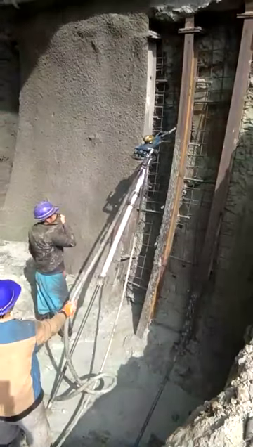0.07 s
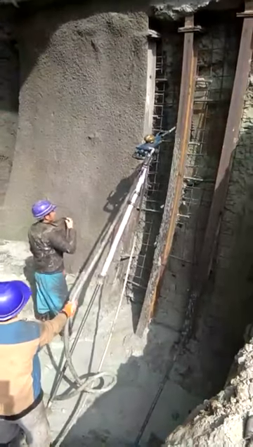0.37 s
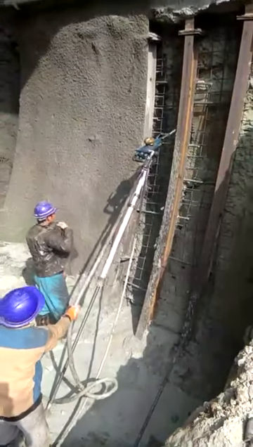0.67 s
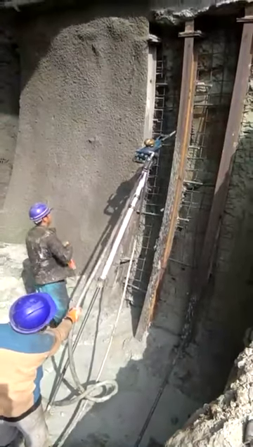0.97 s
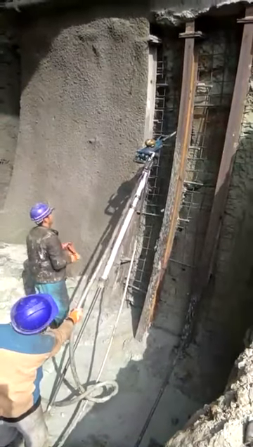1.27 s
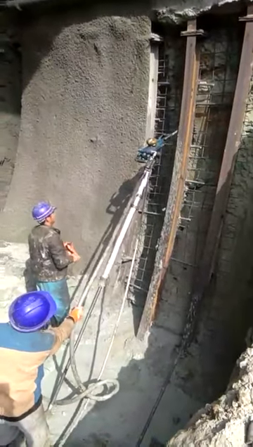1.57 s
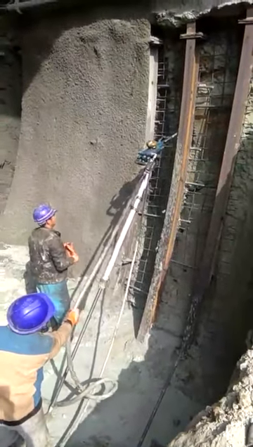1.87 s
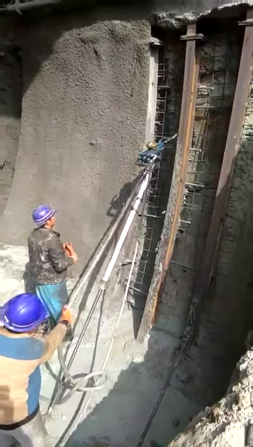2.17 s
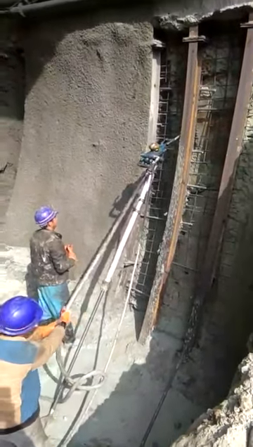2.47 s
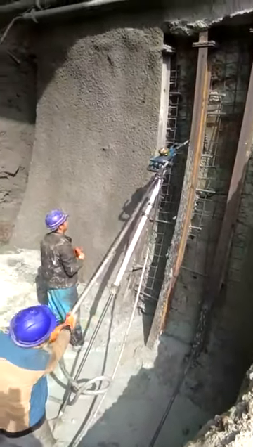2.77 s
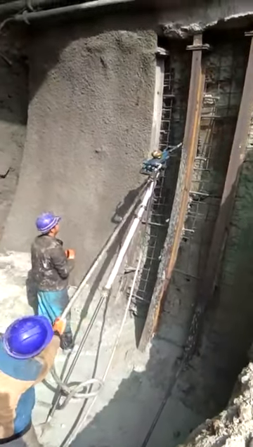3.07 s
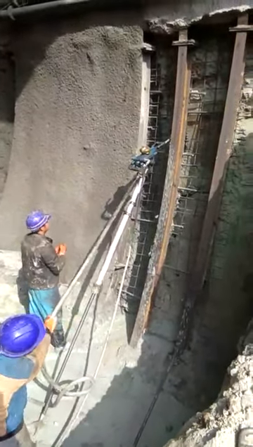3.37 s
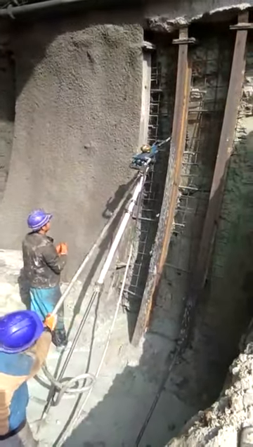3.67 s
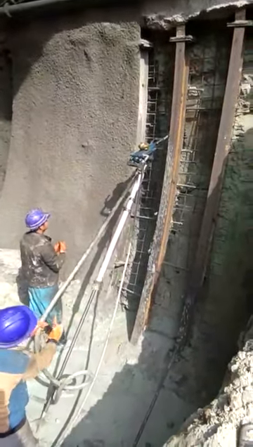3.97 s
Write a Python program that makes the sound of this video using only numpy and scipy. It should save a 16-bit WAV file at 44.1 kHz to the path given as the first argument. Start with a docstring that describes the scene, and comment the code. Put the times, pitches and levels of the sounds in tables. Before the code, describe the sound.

Loud, steady pneumatic drill boring into rock, droning and rattling over a hiss of air.

```python
"""A pneumatic rock drill bores into the wall of a concrete-lined pit, about 42 blows a second.
The exhaust drones and barks on every stroke, the piston makes the drill steel clatter and ring,
chips tick and spent air hisses in pulses. Now and then the bit meets hard stone and clangs.
Two deep dips in the treble fill in after about two and a half seconds; a low rumble lies beneath."""
import sys
import numpy as np
from scipy import signal
from scipy.fft import rfft, irfft
from scipy.io import wavfile
from scipy.ndimage import uniform_filter1d

SR = 44100
rng = np.random.default_rng(int(sys.argv[2]) if len(sys.argv) > 2 else 0)


def generate_wav(sig):
    """Save sig (samples, or channels by samples) to the path in sys.argv[1] as 16-bit PCM at SR."""
    pcm = np.round(np.clip(np.atleast_2d(sig).T, -1, 1) * 32767).astype(np.int16)
    wavfile.write(sys.argv[1], SR, pcm)


N = 176400
TIME = np.arange(N) / SR
BINS_HZ = np.arange(N // 2 + 1) * SR / N

# How far the piston runs ahead of its steady beat as the load changes: time_s, lead_cycles
PISTON_LEAD = [(0, .17), (.3, .18), (.56, .1), (.68, -.04), (.86, .01), (.97, -.11), (1.1, -.11),
               (1.2, -.23), (1.62, -.31), (2.15, -.235), (2.4, -.335), (2.52, -.255), (3.0, -.21),
               (3.38, -.18), (3.55, -.065), (3.95, -.11)]
# Harmonics of the exhaust drone: blow_rate_multiple, level_db
DRONE_HARMONICS = [(2, -41.5), (3, -46), (4, -30), (5, -31.5), (6, -30.5), (7, -43.5), (9, -48.5),
                   (10, -45), (12, -48.5), (14, -48), (15, -50.5), (16, -41), (17, -38.5), (20, -40)]
# Puffs of the two strokes and their slaps off the walls: place_cycles, relative_level_db
PUFF_PATTERN = [(0.005, -3), (0.292, -0.5), (0.521, -8.5), (0.78, -4.5)]
# Tone of an exhaust puff: frequency_hz, gain_db
PUFF_EQ = [(20, -40.5), (70, -27), (150, -20), (310, 7), (355, -9), (395, -1), (470, -15.5), (580, -4.5),
           (660, 1.5), (810, 2.5), (980, -5), (1100, -4), (1700, -16.5), (3000, -22.5), (9000, -48.5)]
# Tone of steel clattering on rock: frequency_hz, gain_db
CLATTER_EQ = [(300, -29.5), (800, 5), (1280, -1.5), (1440, -1), (1670, 1.5), (1830, -9.5), (2000, -4),
              (2190, 2), (2400, -4), (2700, 1.5), (3500, -1.5), (5000, -10), (9000, -17)]
# How hard the bit bites, a fader on clatter and chips: time_s, gain_db
BITE_FADER = [(0, -2), (.35, -1.5), (.5, 1), (.74, -1), (1.1, -0.6), (1.3, 0), (1.45, 0), (1.6, -0.4),
              (1.9, -0.2), (2.4, 0), (2.8, -3), (3.3, -0.6), (3.95, 1.7)]
# The bit meets hard stone and the rod clangs: start_s, accent_db
STONE_HITS = [(.752, 12.5), (0.82, 4.5), (.845, 5), (1.258, 12.5), (1.309, 9.5), (1.335, 9.5), (1.573, 13),
              (1.619, 11.5), (1.91, 9.5)]
# Ringing modes of the drill steel: pitch_hz, early_level_db, late_level_db, t60_s
STEEL_MODES = [(1072, -44, -51, 0.1), (1577, -44.5, -54, 0.069), (1657, -46, -41.5, 0.05),
               (1888, -40, -54, 0.18), (2083, -47.5, -44, 0.1), (2212, -43, -42, 0.035),
               (2432, -40, -53, 0.15), (4084, -37.5, -43, 0.095), (4330, -43.5, -44, .05),
               (5130, -45, -39, 0.05), (4900, -44, -50, 0.054), (5500, -43.5, -47, 0.054)]
# Tone of the spent air, also used on the chips: frequency_hz, gain_db
HISS_EQ = [(300, -23), (900, -5.5), (2400, 1), (3100, -13.5), (3700, -7), (4500, 2), (5500, 0.5),
           (7000, 0.5), (8200, 1), (8800, 1.5), (9600, -3.5)]
# Humps and dips that tint the drill at first: centre_hz, width_hz, gain_db
TINT_BANDS = [(500, 12, 6), (540, 52, 4.5), (1580, 184, 2.5), (3135, 262, -8), (8190, 440, -16.5)]
# Wet/dry mix of that tint: time_s, wet_fraction
TINT_MIX = [(0, 0.89), (.7, 0.97), (2.3, 0.88), (2.55, 0.65), (2.72, 0.03), (3.95, 0.09)]
# Tone of the site rumble: frequency_hz, gain_db
RUMBLE_EQ = [(5, -36), (20, -21), (40, -18.5), (62, -12), (80, 1.5), (100, -6), (170, -4.5), (260, 1),
             (320, -1.5), (450, -8), (900, -26)]

BLOWS_PER_S = 41.6
STRIKE_PLACE, RETURN_PLACE, HISS_PLACE = .2, .66, .32  # within the piston cycle, 0-1


def piston_cycles(jitter_cycles=.011, drag_cycles=.016, rod_turns_per_s=4.1, easiest_s=.14):
    """Running count of piston cycles; the turning rod drags the beat to and fro."""
    cycles = BLOWS_PER_S * TIME + automation(PISTON_LEAD) + jitter_cycles * drift(rate_hz=12)
    return cycles + drag_cycles * np.cos(2 * np.pi * rod_turns_per_s * (TIME - easiest_s))


def exhaust_drone(cycles, roughness=.33):
    """Low harmonics of the exhaust crest together on each stroke; each wavers in level and phase."""
    drone = 0
    for multiple, level_db in DRONE_HARMONICS:
        waver = 1 + roughness * (drift(rate_hz=12) + 1j * drift(rate_hz=12))
        harmonic = np.real(waver * np.exp(2j * np.pi * multiple * cycles))
        drone += from_db(level_db) * unit_rms(harmonic)
    return drone


def exhaust_puffs(cycles, bark_db=-30, housing_db=-37):
    """Air barks sharply from the exhaust port, and the housing rings with every puff."""
    clicks = sum(from_db(db) * cycle_clicks(cycles, place, spread_db=-.6, jitter_s=.0004)
                 for place, db in PUFF_PATTERN)
    clicks -= clicks.mean()
    housing = ring(clicks, pitch_hz=657, t60_s=.13)
    barks = equalise(pit_reverb(clicks, wet_db=-1), PUFF_EQ)
    return from_db(bark_db) * barks + from_db(housing_db) * housing


def bit_clatter(cycles, level_db=-28, decay_s=.0086):
    """Each blow sets off a short burst of rattling steel and crushed rock."""
    strikes = cycle_clicks(cycles, STRIKE_PLACE, spread_db=5, jitter_s=.0014)
    return_knocks = cycle_clicks(cycles, RETURN_PLACE, spread_db=5, jitter_s=.0014)
    blows = strikes + from_db(-5) * return_knocks + from_db(-18) * stone_clicks()
    envelope = signal.lfilter([1], [1, -np.exp(-1 / (decay_s * SR))], blows)
    bursts = pit_reverb(envelope * rng.standard_normal(N), wet_db=6.5)
    return from_db(level_db + automation(BITE_FADER)) * equalise(bursts, CLATTER_EQ)


def steel_ring(cycles, rebound_db=1.5, clang_hz=1750, clang_width_hz=290):
    """The rod rings, struck a little differently each time; its modes rebalance as the tint fades."""
    ringing, early_share = 0, automation(TINT_MIX)
    # The rod bounces, so strong and weak blows alternate.
    rebound = from_db(rebound_db * np.cos(np.pi * (cycles - STRIKE_PLACE)))
    for pitch_hz, early_db, late_db, t60_s in STEEL_MODES:
        blows = rebound * cycle_clicks(cycles, STRIKE_PLACE, spread_db=2.2, jitter_s=.0004)
        clangs = bell_curve(pitch_hz, clang_hz, clang_width_hz) * stone_clicks()
        level_db = late_db + early_share * (early_db - late_db)
        ringing += from_db(level_db) * ring(blows + clangs, pitch_hz, t60_s)
    return ringing


def stone_clicks():
    """One click for each blow on hard stone."""
    start_s, accent_db = np.transpose(STONE_HITS)
    return np.bincount((start_s * SR).astype(int), from_db(accent_db), N)


def rock_chips(level_db=-34, ticks_per_s=420, spread_db=3.5, low_hz=1317, high_hz=6966, pitches=36):
    """Chips of rock and loose fittings tick at scattered pitches, louder when the bit bites."""
    onsets = rng.random(N) < ticks_per_s / SR
    clicks = onsets * from_db(spread_db * np.minimum(rng.standard_normal(N), 1))
    pitch_index = rng.integers(0, pitches, N)
    ticks = sum(ring(clicks * (pitch_index == k), pitch_hz, t60_s=.03)
                for k, pitch_hz in enumerate(np.geomspace(low_hz, high_hz, pitches)))
    return from_db(level_db + automation(BITE_FADER)) * equalise(ticks, HISS_EQ)


def air_hiss(cycles, level_db=-23.5, pulse_db=.4, flutter_db=1.5):
    """Spent air swells once a cycle and flutters."""
    flutter = drift(rate_hz=70)
    flutter -= uniform_filter1d(flutter, size=2200)  # keep only the fast movement
    swell_db = pulse_db * np.cos(2 * np.pi * (cycles - HISS_PLACE)) + flutter_db * flutter
    return from_db(level_db + swell_db) * equalise(rng.standard_normal(N), HISS_EQ)


def pit_reverb(sound, wet_db, t60_s=.15, crossfade_s=.45):
    """Adds dense wall reflections whose resonances shift as the listening point sways."""
    tail_s, wet = TIME[:SR // 2], 0
    for centre_s in np.arange(0, TIME[-1] + crossfade_s, crossfade_s):
        tail = rng.standard_normal(len(tail_s)) * from_db(-60 * tail_s / t60_s)
        share = np.clip(1 - np.abs(TIME - centre_s) / crossfade_s, 0, 1)
        wet += np.sqrt(share) * signal.fftconvolve(sound, tail / np.linalg.norm(tail))[:N]
    return sound + from_db(wet_db) * wet


def tint(sound):
    """Humps in the mids and two dips in the treble, strong at first and then almost gone."""
    gain_db = sum(db * bell_curve(BINS_HZ, hz, width_hz) for hz, width_hz, db in TINT_BANDS)
    wet = irfft(rfft(sound) * from_db(gain_db), N)
    return sound + automation(TINT_MIX) * (wet - sound)


def site_rumble(gain_db=-30.5, low_cut_hz=23.8):
    """A steady bed of low noise from the site."""
    noise = equalise(rng.standard_normal(N), RUMBLE_EQ)
    low_cut = signal.butter(2, low_cut_hz, "high", fs=SR, output="sos")
    return from_db(gain_db) * signal.sosfilt(low_cut, noise)


def cycle_clicks(cycles, place, spread_db, jitter_s):
    """One click per piston cycle, each of its own strength and slightly off the beat."""
    beats = np.arange(int(cycles[-1]) + 1) + place
    timing, strength = rng.standard_normal((200, 2))[:len(beats)].T
    start_s = np.interp(beats, cycles, TIME, left=-1, right=-1) + jitter_s * timing
    starts = (start_s * SR).astype(int)
    inside = (starts >= 0) & (starts < N)
    gains = from_db(spread_db * np.minimum(strength, 1.5))
    return np.bincount(starts[inside], gains[inside], N)


def ring(clicks, pitch_hz, t60_s):
    """One struck mode, at unit level."""
    radius, angle = from_db(-60 / (t60_s * SR)), 2 * np.pi * pitch_hz / SR
    feedback = [1, -2 * radius * np.cos(angle), radius * radius]
    return unit_rms(signal.lfilter([1], feedback, clicks + 1e-18))


def equalise(sound, curve):
    """Minimum-phase EQ, so nothing rings ahead of a hit; returns unit level."""
    hz, db = np.transpose(curve)
    gain_db = np.interp(np.log(BINS_HZ + 1), np.log(hz), db)
    cepstrum = irfft(np.log(from_db(gain_db)), N)
    cepstrum[1:N // 2] *= 2
    cepstrum[N // 2 + 1:] = 0
    return unit_rms(irfft(rfft(sound) * np.exp(rfft(cepstrum)), N))


def drift(rate_hz):
    """Smooth random modulation, at unit level."""
    return unit_rms(irfft(rfft(rng.standard_normal(N)) / (1 + (BINS_HZ / rate_hz) ** 2), N))


def automation(points):
    """Straight ramps between (time_s, value) points."""
    return np.interp(TIME, *np.transpose(points))


def bell_curve(hz, centre_hz, width_hz):
    """A Gaussian hump of height 1."""
    return np.exp(-.5 * ((hz - centre_hz) / width_hz) ** 2)


def from_db(db):
    """Decibels to gain."""
    return 10 ** (np.asarray(db) / 20)


def unit_rms(sound):
    """Scale to unit level."""
    return sound / np.sqrt(np.mean(sound ** 2) + 1e-20)


def scene():
    """The drill hammers to one piston's beat over the site rumble; both channels are alike."""
    cycles = piston_cycles()
    exhaust = exhaust_drone(cycles) + exhaust_puffs(cycles)
    drill = exhaust + bit_clatter(cycles) + steel_ring(cycles) + rock_chips() + air_hiss(cycles)
    return np.tile(tint(drill) + site_rumble(), (2, 1))


def record(dry):
    """The sound stops short; a steep high cut takes off the top."""
    stop_s, high_cut_hz = 3.952, 9700
    high_cut = signal.ellip(14, .1, 80, high_cut_hz, fs=SR, output="sos")
    return signal.sosfilt(high_cut, dry * (TIME < stop_s))


dry = scene()
out = record(dry)
generate_wav(out)
```